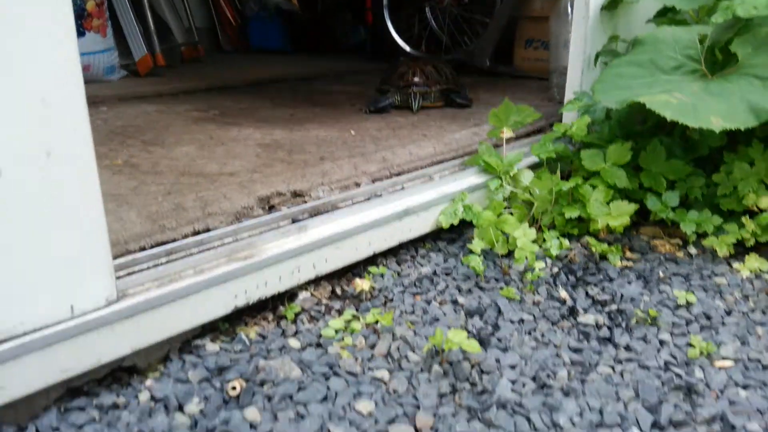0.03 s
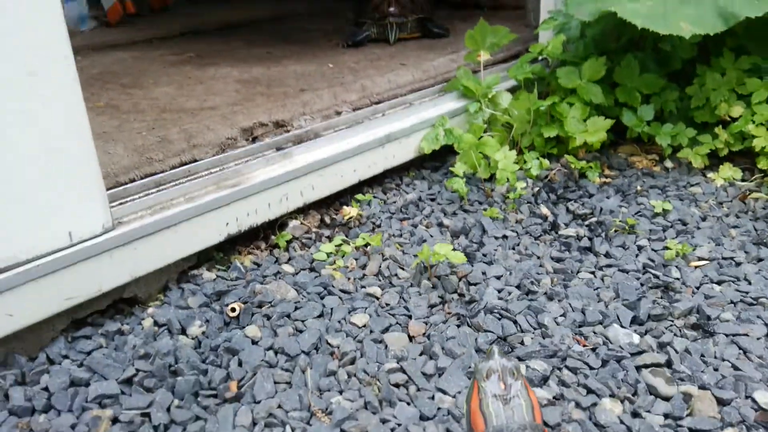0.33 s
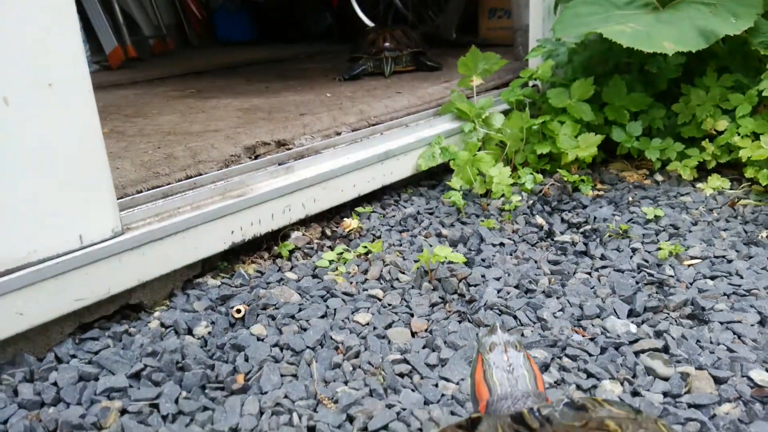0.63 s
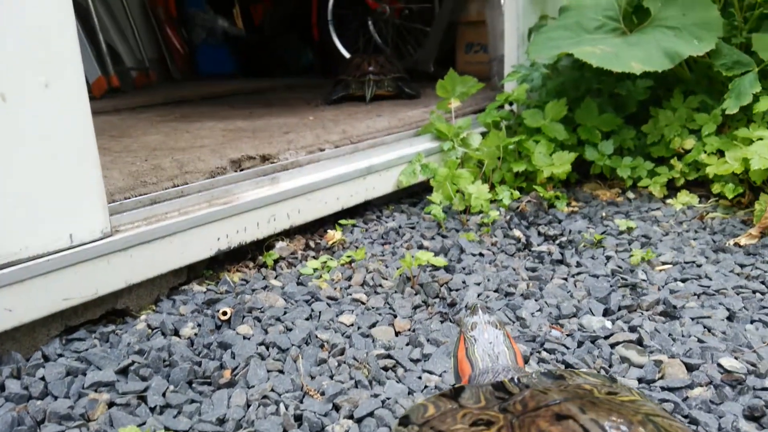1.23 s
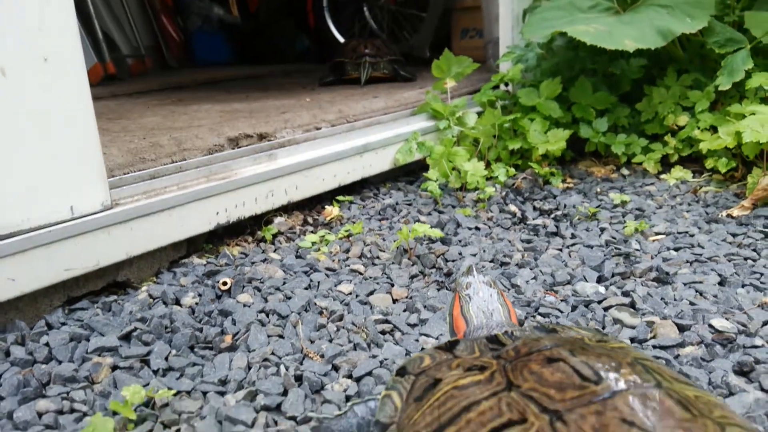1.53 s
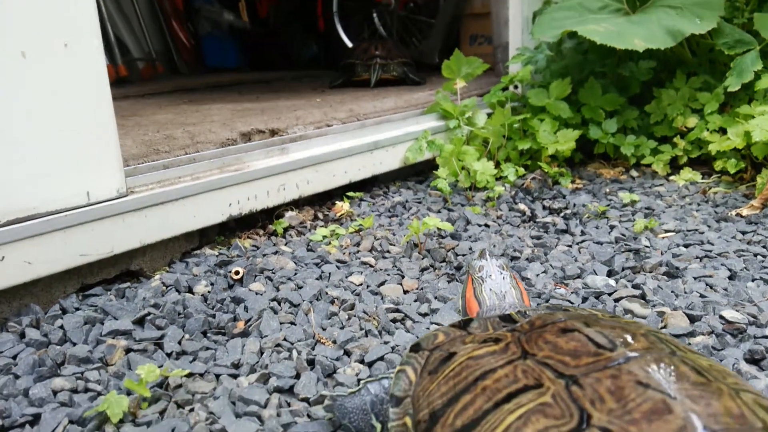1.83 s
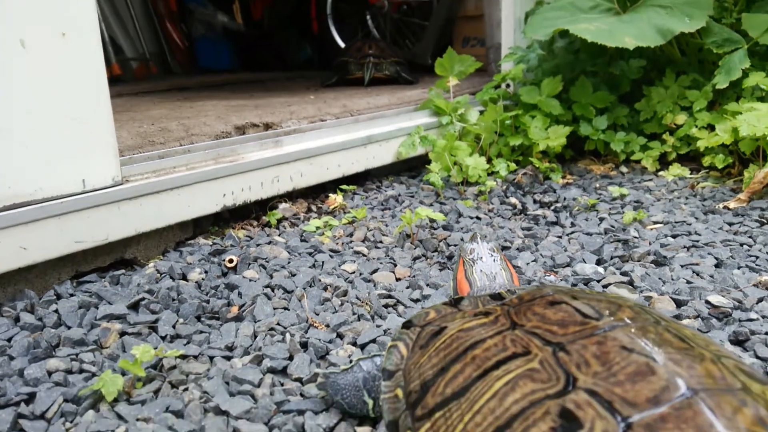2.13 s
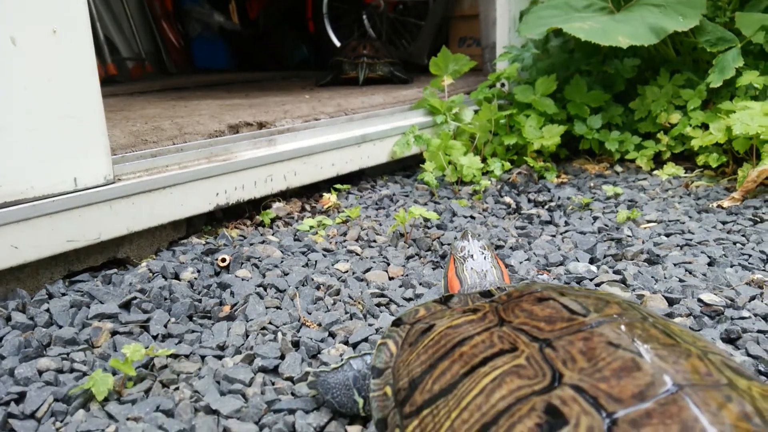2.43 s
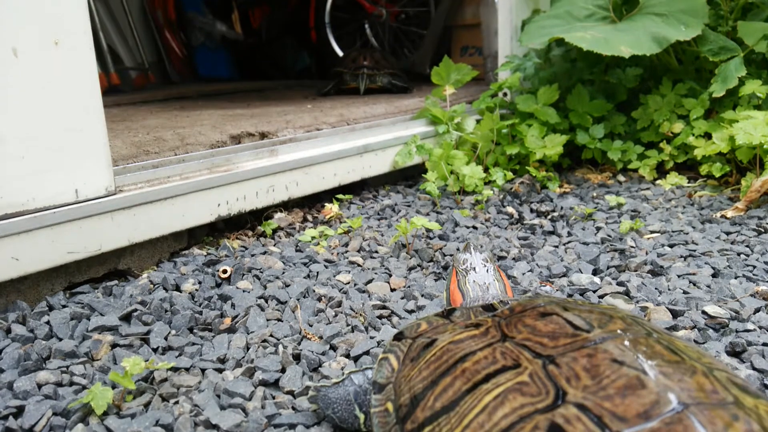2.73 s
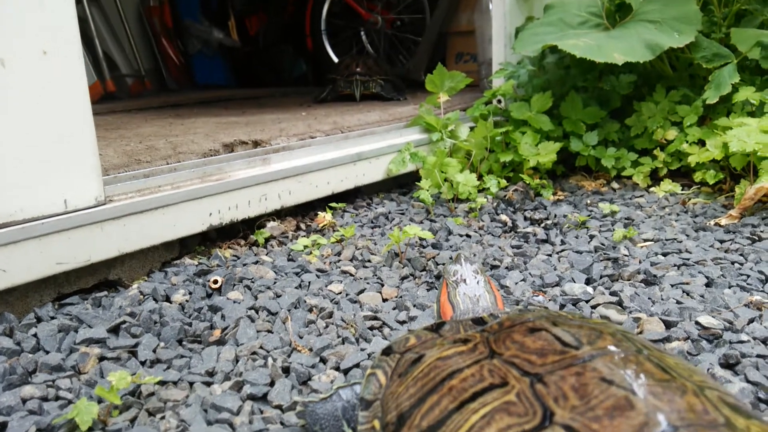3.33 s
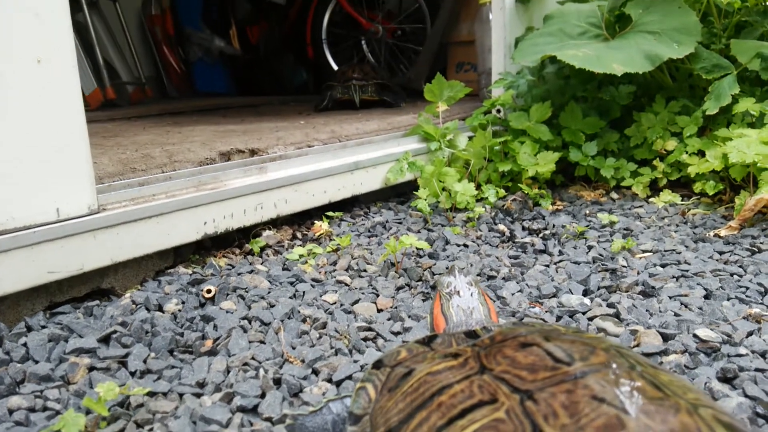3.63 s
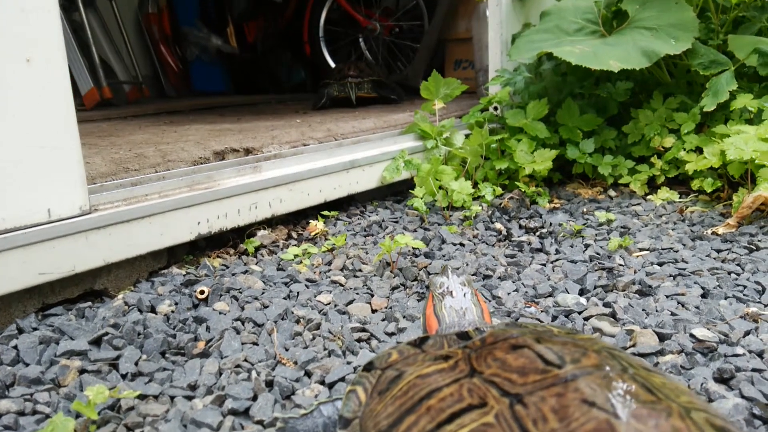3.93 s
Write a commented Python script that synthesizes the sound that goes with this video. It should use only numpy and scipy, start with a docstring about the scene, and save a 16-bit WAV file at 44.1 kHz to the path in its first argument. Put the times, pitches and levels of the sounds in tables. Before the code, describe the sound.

Small stones knock, tick and rustle as a turtle crosses gravel close by, busily at first, then sparsely. Light wind buffets the microphone throughout, over a quiet outdoor hush, and a faraway bird sings a few late notes.

```python
"""A turtle on slate gravel

A turtle walks over gravel close to the microphone. Each stone it tips rings in damped modes, heard as
a knock, a clack and a tick; sliding stones scrape and fine grit rustles. A light wind buffets the left
microphone port, once with a short flutter. Behind lie a faint outdoor hush and a distant bird."""
import sys
import numpy as np
from scipy import signal
from scipy.fft import rfft, irfft, next_fast_len
from scipy.io import wavfile
from scipy.ndimage import map_coordinates

SR = 44100
rng = np.random.default_rng(int(sys.argv[2]) if len(sys.argv) > 2 else 0)


def dump(signal):
    """Clip the signal to [-1, 1] and save it as 16-bit WAV at the path in sys.argv[1]."""
    limited = np.clip(np.atleast_2d(signal).T, -1, 1)
    pcm = np.round(limited * 32767).astype(np.int16)
    wavfile.write(sys.argv[1], SR, pcm)


N = 176400

# Tipping stones. Each row: start in seconds, knock, clack and tick pitch in Hz,
# then relative level in dB of the bed, knock, clack and tick.
STONE_IMPACTS = [(0.015,1470,3500,7650,-59,-42.5,-64,-50), (.05,1360,3480,7540,-56,-51,-82,-66.5),
                 (0.106,1450,3300,7560,-58,-55,-78,-87), (.13,1180,3700,7600,-58,-70,-77,-64),
                 (.244,1240,2500,7000,-54.5,-51.5,-57.5,-80), (.566,1095,3500,7800,-54,-49,-70,-74),
                 (.595,1180,3730,7900,-69,-57,-74,-64.5), (0.6854,960,3500,7530,-56,-55.5,-60,-49),
                 (.711,1290,3500,7600,-54,-51.5,-68,-81), (0.738,1180,5100,10300,-56,-59.5,-67,-56.5),
                 (0.7847,990,5230,7730,-63,-42,-59,-55), (.844,1190,3460,7600,-53.5,-52.5,-63,-63.5),
                 (.879,970,4800,7500,-47.5,-38.5,-52,-49.5), (.93,1750,3400,7500,-56,-50,-54.5,-64),
                 (.956,1260,4120,8160,-37.5,-30,-32.5,-42), (1.041,1020,3700,7350,-71,-55.5,-67,-64.5),
                 (1.074,930,3480,7700,-60,-51,-66,-70), (1.276,1130,3530,7600,-53.5,-67,-75,-68),
                 (1.396,985,3500,7600,-57,-62.5,-82,-85), (1.528,1170,3700,7800,-82,-83,-84,-71.5),
                 (1.635,1610,3940,7000,-60,-51,-64,-62), (1.827,1020,3530,7600,-52,-54,-67,-77),
                 (1.8694,1380,3270,7420,-41,-34,-45,-50.5), (1.96,940,3140,7250,-45,-43.5,-57,-52),
                 (2.026,940,3500,8500,-70,-50.5,-81,-69), (2.044,914,3500,8500,-69,-54.5,-78,-65.5),
                 (2.472,1130,3500,8000,-58,-65,-80,-77), (3.252,950,2960,10900,-82,-56.5,-74,-65.5),
                 (3.265,1170,3150,7500,-78,-66,-60.5,-68), (3.338,1090,3100,8300,-60.5,-62,-65.5,-69),
                 (3.609,1000,3670,7500,-62,-65,-65.5,-67)]
# Modes of a stone. Each row: multiple of the pitch, relative level in dB, T60 in seconds.
KNOCK_MODES = [(.55, -14.5, 0.0065), (.78, -2, 0.0084), (.97, -1, 0.0066), (1.14, -1.5, 0.0063),
               (1.34, -6.5, 0.0043), (1.75, -17.5, 0.0089)]
CLACK_MODES = [(.8, -3, .006), (.9, -1, .007), (.98, 0, .012), (1.2, -14, .005)]
TICK_MODES = [(.68, -4.5, 0.0047), (.86, -0.5, .004), (.98, -1.5, .005), (1.08, -1.5, 0.0036),
              (1.19, -1.5, 0.0036), (1.55, -16, .003)]
# Modes of the gravel bed. Each row: frequency in Hz, relative level in dB, T60 in seconds.
BED_MODES = [(282, -8, 0.025), (396, -2, 0.011)]
# Reverberation of the yard. Each row: frequency in Hz, T60 in seconds.
YARD_DECAY = [(200, 0.99), (1000, 0.15), (4000, 0.39), (12000, 0.17)]
# Sliding stones. Each row: midpoint and length in seconds, relative level in dB, frequency multiplier.
SLIDES = [(.035,0.092,-50.5,1.7), (0.122,.055,-54.5,1), (0.59,0.12,-51,1.3), (0.72,.13,-55,1.1),
          (0.888,0.062,-45.5,1), (1.855,0.049,-54.5,1), (2.036,.11,-66,1.2), (2.474,0.1,-60,1.45),
          (2.585,.41,-72,1.4)]
# Puffs of air. Each row: start in seconds, relative thump level in dB, thump pitch in Hz,
# relative slap level in dB.
AIR_PUFFS = [(.108,-23.5,186,-33), (0.131,-26,120,-30.5), (0.334,-13,90,-31.5), (.552,-21.5,166,-32),
             (0.698,-27,233,-34), (0.74,-31,118,-26.5), (.917,-15.5,68,-27), (1.125,-12.5,103,-23),
             (1.19,-13,94.5,-32), (1.235,-39,130,-37), (1.353,-30,130,-26.5), (1.779,-36,140,-34),
             (1.797,-17,100,-30.5), (2.05,-50,200,-32.5), (2.107,-41,244,-30), (2.157,-27.5,167,-31.5),
             (2.279,-21.5,130,-25.5), (2.331,-27.5,165,-42), (2.621,-28,169,-44), (2.699,-23,122,-55),
             (3.49,-28,80,-41), (3.601,-24,131,-52), (3.724,-38,230,-33.5)]
# Bird notes. Each row: start in seconds, relative level in dB.
BIRD_NOTES = [(3.409, -68), (3.504, -56.5), (3.604, -55), (3.703, -56), (3.804, -58)]

# Envelopes of the noises; the wash is the scattered echo of the bird's song.
# Each row: time in seconds, relative level in dB.
GRIT_ENVELOPE = [(0,-51), (.1,-70), (.4,-67.5), (.55,-63.5), (.72,-61), (.92,-62), (1.05,-63), (1.25,-73.5),
                 (1.45,-77.5), (1.65,-72.5), (1.85,-69.5), (1.89,-60.5), (2.1,-62.5), (2.2,-76), (2.6,-85),
                 (3.22,-96), (3.3,-77.5), (3.7,-72.5), (3.97,-76)]
WIND_ENVELOPE = [(0.0, -43.5), (0.15, -26.5), (0.25, -36.5), (0.34, -23.5), (0.39, -33.5), (0.42, -27),
                 (0.57, -32), (0.73, -33.5), (0.75, -22), (0.86, -39.5), (0.92, -25), (0.99, -33),
                 (1.18, -36.5), (1.31, -35), (1.36, -32.5), (1.4, -59), (1.45, -32.5), (1.58, -44),
                 (1.72, -32), (1.76, -40.5), (1.8, -28.5), (1.85, -47), (2.0, -31.5), (2.24, -40),
                 (2.29, -34), (2.4, -38.5), (2.9, -42), (2.99, -52), (3.07, -42.5), (3.28, -46), (3.5, -29),
                 (3.58, -33), (3.6, -26.5), (3.67, -37), (3.97, -32.5)]
FLUTTER_ENVELOPE = [(0.301, -49.5), (0.4, -43), (.407, -22), (0.422, -25), (0.437, -18.5), (.452, -34.5),
                    (0.476, -34), (.53, -54)]
HUSH_ENVELOPE = [(0, -55.5), (1.4, -58.5), (1.6, -61.5), (1.9, -58), (2.8, -59.5), (3.2, -60), (3.6, -58.5),
                 (4, -60.5)]
WASH_ENVELOPE = [(3.3, -110), (3.42, -72), (3.6, -66), (3.8, -67.5), (4, -62.5)]

# Spectra of the noises. Each row: frequency in Hz, relative level in dB.
SCRAPE_SPECTRUM = [(150, -16), (400, 4), (800, 11.5), (1200, -4.5), (1900, -9.5), (2800, -7), (6000, -24.5),
                   (12000, -45)]
GRIT_SPECTRUM = [(200, 6), (600, 9), (1100, 7.5), (1800, 4), (2800, -5.5), (4500, -9.5), (7000, 0.5),
                 (9700, -3.5), (11000, -10), (15500, -19.5)]
WIND_SPECTRUM = [(3, -0.5), (10, 2.5), (20, 10), (27, -2.5), (38, -13), (60, -11.5), (90, -17.5),
                 (130, -26.5), (200, -43), (400, -47.5), (900, -56), (3000, -110)]
FLUTTER_SPECTRUM = [(120, -15), (220, -17), (280, 0), (360, -9), (470, -3), (550, -6), (680, -24),
                    (1200, -39), (2000, -36), (3500, -72)]
HUSH_LEFT_SPECTRUM = [(100, 1), (300, -2), (470, -9.5), (620, -2.5), (730, 2.5), (960, 3.5), (1100, -8.5),
                      (1350, -17), (1600, -12.5), (1950, -3.5), (2600, -4.5), (3100, -13.5), (3700, -13),
                      (5000, -16), (7000, -25), (10000, -37.5), (15000, -34.5)]
HUSH_RIGHT_SPECTRUM = [(100, 3), (220, 4), (340, -2), (550, -6), (950, -10), (1700, -17.5), (3000, -17),
                       (6000, -20), (10000, -32.5), (15000, -32.5)]
WASH_SPECTRUM = [(3000, -60), (3700, -16), (4050, -4), (4400, 0), (4700, -3), (5000, -16), (5800, -60)]


def amp(db):
    """Amplitude grows tenfold for every 20 dB."""
    return 10 ** (np.asarray(db) / 20)


def unit(x):
    """Normalisation to an rms of 1."""
    return x / np.sqrt(np.mean(x ** 2) + 1e-20)


def pan(db):
    """Stereo gains for a level difference, left minus right."""
    gains = amp(np.array([[db], [-db]]) / 2)
    return gains / gains.mean()


def along(points, hz):
    """Interpolation of (Hz, value) points on a logarithmic frequency axis."""
    freqs, values = np.transpose(points)
    return np.interp(np.log(hz + 1), np.log(freqs + 1), values)


def envelope(rows):
    """Gain per sample, linear in decibels between (seconds, dB) points."""
    return amp(np.interp(np.arange(N) / SR, *np.transpose(rows)))


def wobble(per_s):
    """Smooth modulation: a spline through random values."""
    return map_coordinates(rng.standard_normal(4000), [np.arange(N) * per_s / SR], mode="mirror")


def filtered(x, response):
    """Filtering multiplies the spectrum by a frequency response."""
    size = next_fast_len(N + SR // 2)
    return irfft(rfft(x, size) * response(np.fft.rfftfreq(size, 1 / SR)), size)[..., :N]


def noise(spectrum, channels=1):
    """White noise filtered to a spectrum, with an rms of 1."""
    return unit(filtered(rng.standard_normal((channels, N)), lambda hz: amp(along(spectrum, hz))))


def add(track, start, x):
    """Superposition of x on a track, from a start in seconds."""
    part = track[..., max(0, round(start * SR)):][..., :x.shape[-1]]
    part += x[..., :part.shape[-1]]


def reverb(x, decay):
    """Diffuse reflections: convolution with stereo noise that decays by (Hz, T60) points."""
    hz, t, bands = signal.stft(rng.standard_normal((2, SR // 2)), SR, nperseg=256)
    tail = signal.istft(bands * amp(-60 * t / along(decay, hz)[:, None]), SR, nperseg=256)[1]
    return signal.fftconvolve(x[None], tail / np.linalg.norm(tail[0]), axes=1)


def ring(modes, rebound_db, pitch=1, flat_share=0, settle_s=.0019, rebound_s=.0015):
    """A strike and two weaker rebounds excite damped modes, which may start flat and rise to pitch."""
    t = np.arange(SR // 20) / SR
    t = t - flat_share * settle_s * (1 - np.exp(-t / settle_s))
    hz, db, t60 = np.transpose(modes)[:, :, None]
    hz = pitch * hz * np.exp(.03 * rng.standard_normal(hz.shape))  # stones vary in size
    x = np.zeros(len(t))
    for k in range(3):
        age = np.maximum(t - k * rebound_s * rng.uniform(.807, 1.189), 0)
        strike = rng.choice([-1, 1], hz.shape) * amp(db + k * rebound_db + rng.standard_normal(hz.shape))
        attack = 1 - np.exp(-hz * age)
        x += np.sum(strike * attack * amp(-60 * age / t60) * np.sin(2 * np.pi * hz * age), axis=0)
    return x / np.sqrt(np.sum(x ** 2) / (.02 * SR))  # the energy of 20 ms at rms 1


def stones():
    """Impact sets each stone and the bed beneath it into modal vibration, and the yard reflects it."""
    out = np.zeros((2, N))
    for start, knock_hz, clack_hz, tick_hz, bed_db, knock_db, clack_db, tick_db in STONE_IMPACTS:
        knock = amp(knock_db) * pan(-2) * ring(KNOCK_MODES, -2.5, knock_hz)
        tick = amp(tick_db - .5) * pan(-14.5) * ring(TICK_MODES, -1.5, tick_hz)
        clack = amp(clack_db - 2) * pan(-14.5) * ring(CLACK_MODES, -2.5, clack_hz, flat_share=.14)
        left, right = knock + tick + clack
        add(out[0], start + .0001, left)  # reaches the left port later
        add(out[1], start, right)
        jolt = amp(bed_db + 8) * ring(BED_MODES, rebound_db=-23)
        add(out, start + .001, np.array([jolt, -amp(-4.5) * jolt]))  # shakes the ports in antiphase
        radiated = (knock + tick + amp(-5) * clack).mean(0)
        add(out, start, amp(-13.5) * reverb(radiated, YARD_DECAY))
    return out


def scrapes(roughness_db=5.5, slips_per_s=300):
    """Friction of stone on stone gives short swells of noise, roughened by irregular slips."""
    slides = np.zeros(N)
    for middle, length, db, pitch in SLIDES:
        push = amp(db) * np.hanning(int(length * SR))
        friction = noise([(pitch * hz, band_db) for hz, band_db in SCRAPE_SPECTRUM])[0, :len(push)]
        add(slides, middle - length / 2, push * friction)
    return slides * unit(amp(roughness_db * wobble(slips_per_s)))


def grit(grains_per_s=210, grain_t60_s=.005):
    """Random collisions of grit under feet and shell merge into a rustle, with separate ticks on top."""
    hits = (rng.random(N) < grains_per_s / SR) * amp(6 * np.clip(rng.standard_normal(N), -2, 2))
    decay = amp(-60 * np.arange(SR // 50) / SR / grain_t60_s)
    grains = unit(signal.fftconvolve(hits, decay)[:N] * noise(GRIT_SPECTRUM, channels=2))
    rustle = noise(GRIT_SPECTRUM, channels=2)
    return envelope(GRIT_ENVELOPE) * pan(-9) * (amp(1) * rustle + amp(-1) * grains)


def puffs(slap_hz=342.6, slap_t60_s=.011, thump_t60_s=.024):
    """Each puff on the port is two damped oscillations: a short slap and a lower thump."""
    t = np.arange(SR // 10) / SR
    slap_phase = 2 * np.pi * slap_hz * t
    slap = amp(-.5 - 60 * t / slap_t60_s) * np.sin(slap_phase) * slap_phase / 2
    thump_shape = amp(2 - 60 * t / thump_t60_s) * (1 - np.exp(-t / .0028))
    out = np.zeros(N)
    for start, thump_db, hz, slap_db in AIR_PUFFS:
        add(out, start, amp(slap_db) * slap + amp(thump_db) * thump_shape * np.sin(2 * np.pi * hz * t))
    return out


def flutter():
    """Air flutters once at the port: amplitude-modulated noise with low spectral peaks."""
    first_s, last_s = FLUTTER_ENVELOPE[0][0], FLUTTER_ENVELOPE[-1][0]
    burst = envelope([(first_s - .1, -120), *FLUTTER_ENVELOPE, (last_s + .12, -120)])
    return burst * noise(FLUTTER_SPECTRUM)[0]


def wind():
    """Turbulent pressure rumbles, puffs and flutters on the left port; the right is sheltered."""
    eddies = amp(2.2 * wobble(per_s=30))
    left, right = amp(17.5) * envelope(WIND_ENVELOPE) * unit(eddies * noise(WIND_SPECTRUM, channels=2))
    thumps, burst = puffs(), flutter()
    sheltered = amp(-37.5) * right - amp(-28) * left - amp(-13) * thumps + amp(-23.5) * burst
    return np.array([left + thumps + burst, sheltered])


def hush():
    """Distant outdoor noise, uncorrelated between the ports, stronger and hollower on the left."""
    waver = amp(2 * wobble(per_s=16))
    air = np.vstack([noise(HUSH_LEFT_SPECTRUM), noise(HUSH_RIGHT_SPECTRUM)])
    return envelope(HUSH_ENVELOPE) * waver * pan(5.5) * air


def bird(note_hz=4500, note_s=.048, warble_hz=45, whistle_hz=3320, whistle_s=.42):
    """A thin whistle, then notes that hold and drop in pitch; scattering blurs them over distance."""
    song = np.zeros(N)
    t = np.arange(int(note_s * SR)) / SR
    fall_hz = 8500 * t * (t / note_s) ** 2
    for start, db in BIRD_NOTES:
        hz = note_hz - fall_hz + warble_hz * wobble(per_s=400)[:len(t)]
        add(song, start, amp(db) * np.hanning(len(t)) * np.sin(2 * np.pi * np.cumsum(hz) / SR))
    t = np.arange(int(whistle_s * SR)) / SR
    whistle = amp(-70) * np.hanning(len(t)) * np.sin(2 * np.pi * whistle_hz * t)
    add(song, 2.18, whistle)
    wash = envelope(WASH_ENVELOPE) * noise(WASH_SPECTRUM, channels=2)
    echoes = amp(-2) * reverb(song, decay=[(note_hz, .9)])[:, :N]
    return pan(3) * (song + echoes + wash)


def scene():
    """Sound pressures add: gravel close by, wind on the microphone, hush and bird behind."""
    return stones() + scrapes() + grit() + wind() + hush() + bird()


def record(dry, top_hz=15700):
    """An ideal low-pass filter removes everything above the band limit."""
    return filtered(dry, lambda hz: hz < top_hz)


dry = scene()
out = record(dry)
dump(out)
```